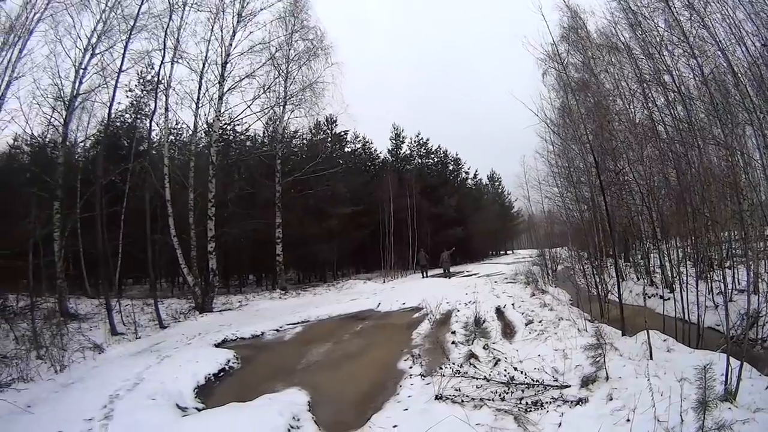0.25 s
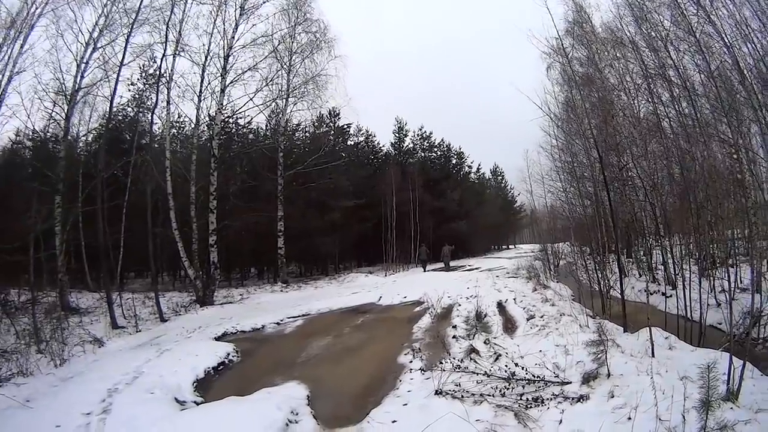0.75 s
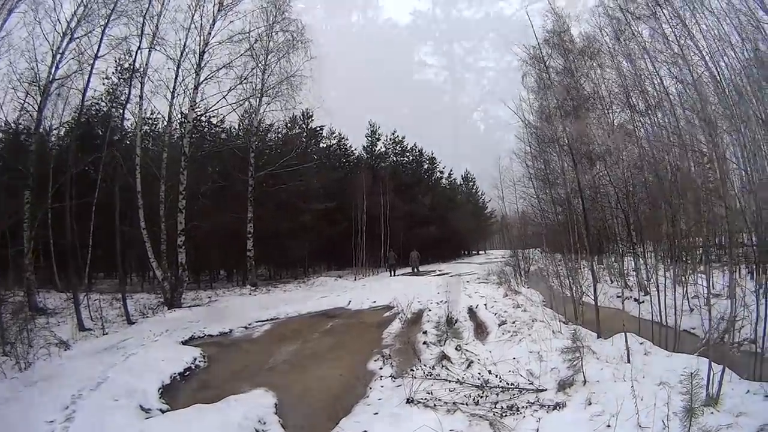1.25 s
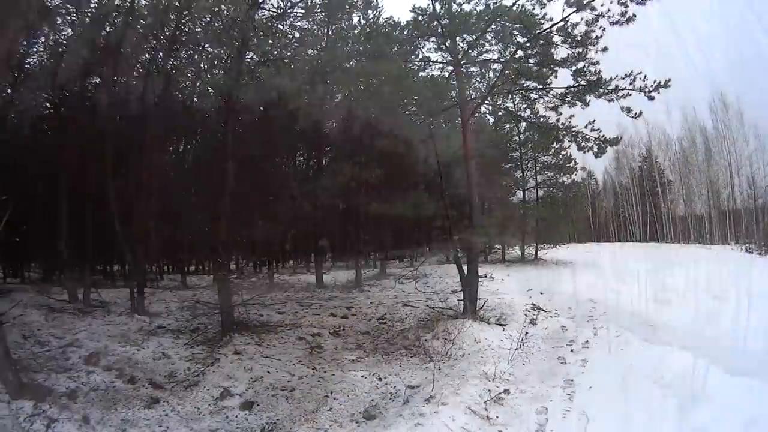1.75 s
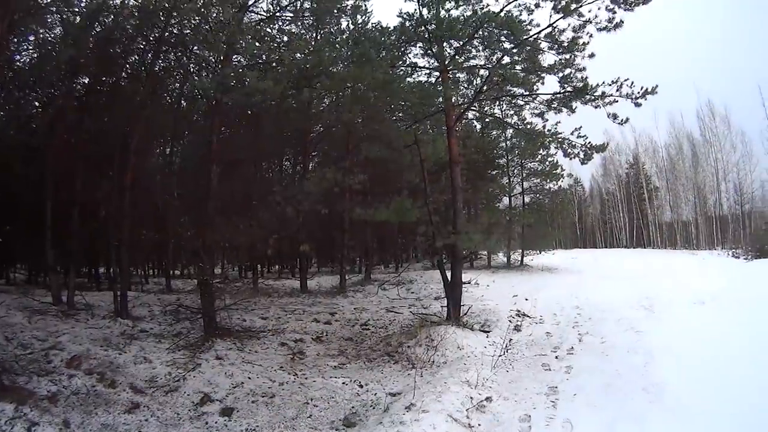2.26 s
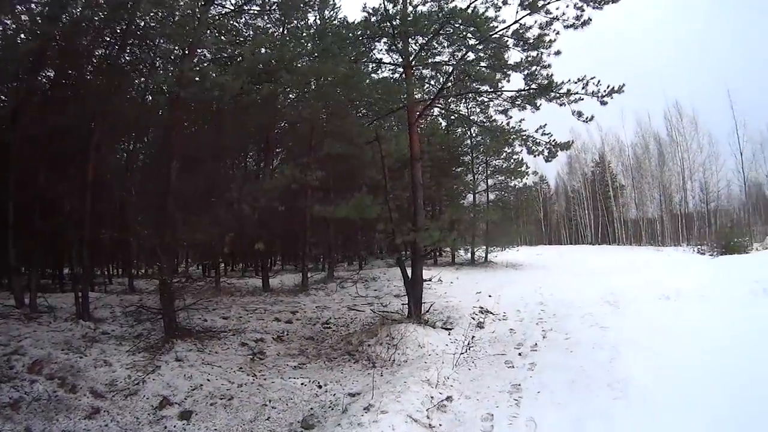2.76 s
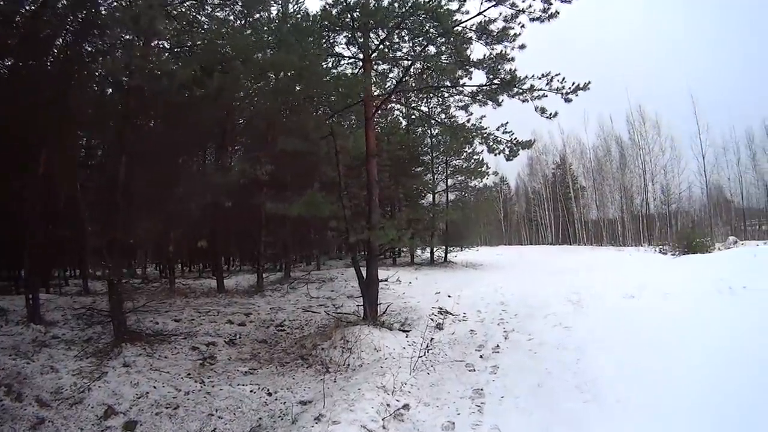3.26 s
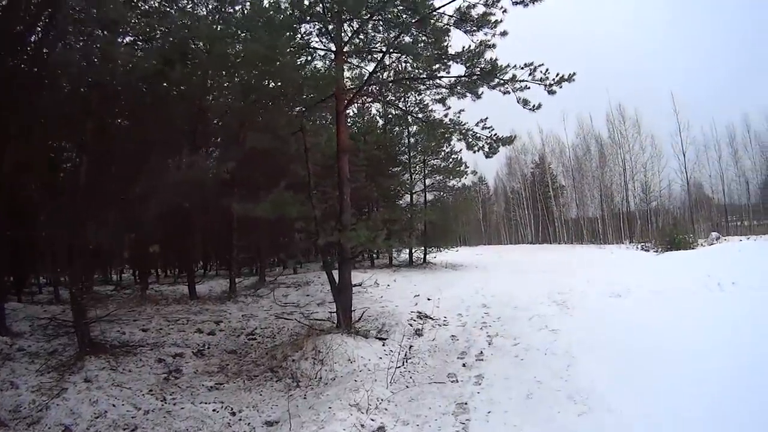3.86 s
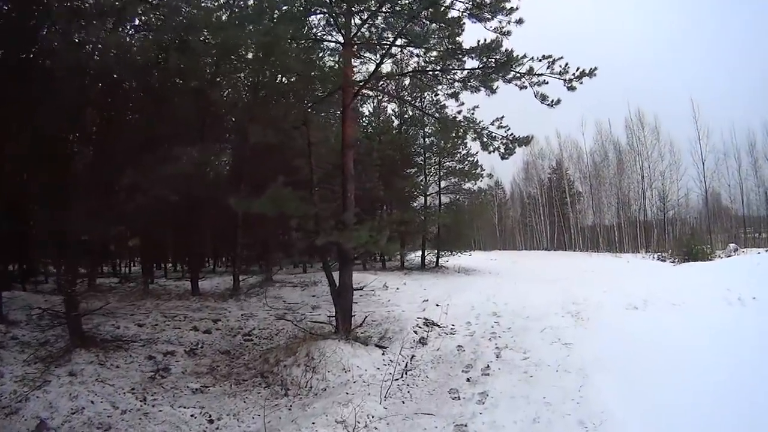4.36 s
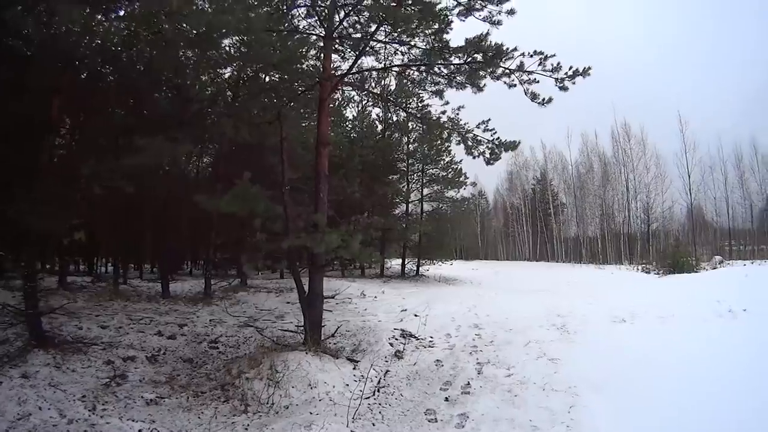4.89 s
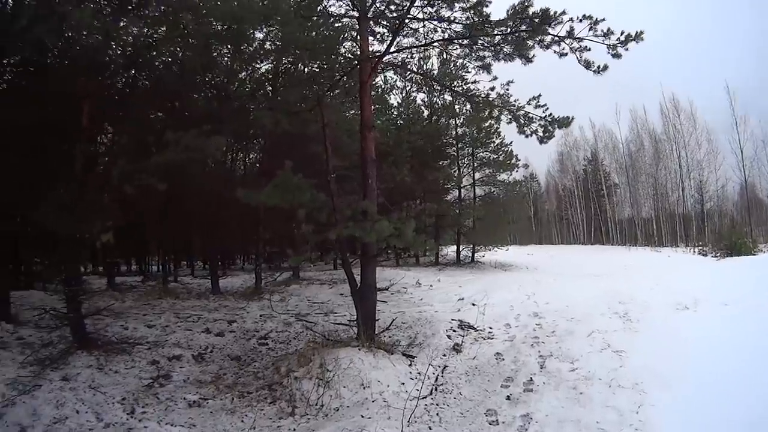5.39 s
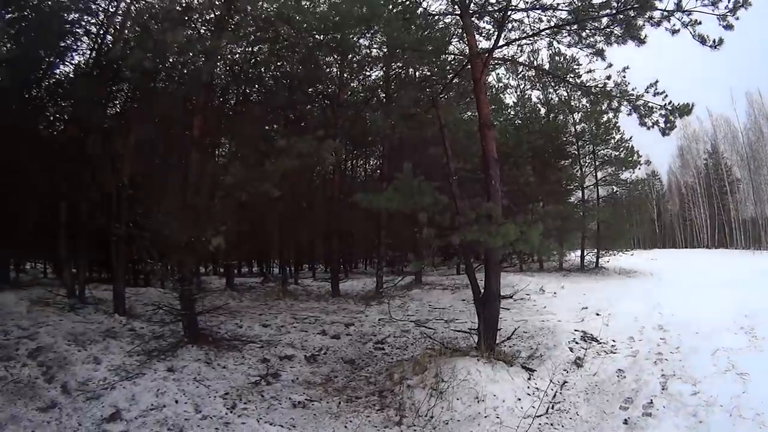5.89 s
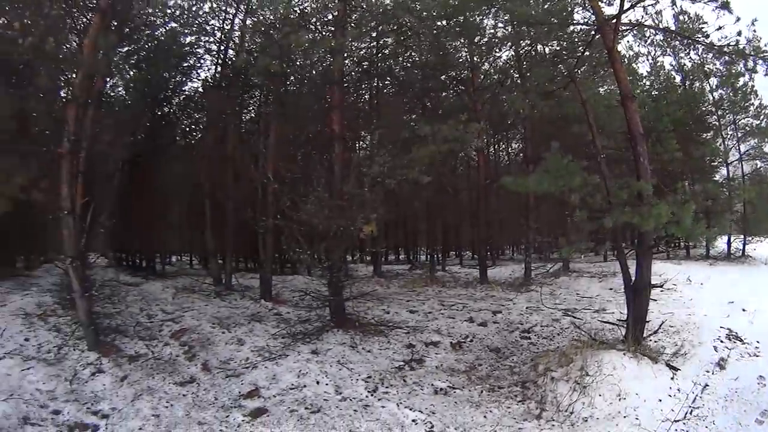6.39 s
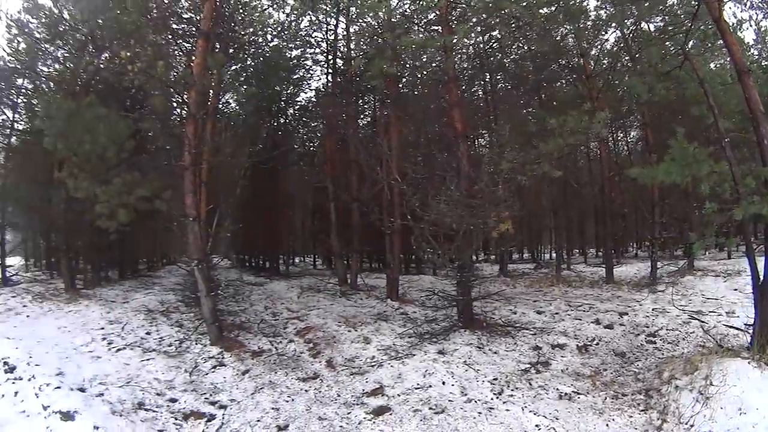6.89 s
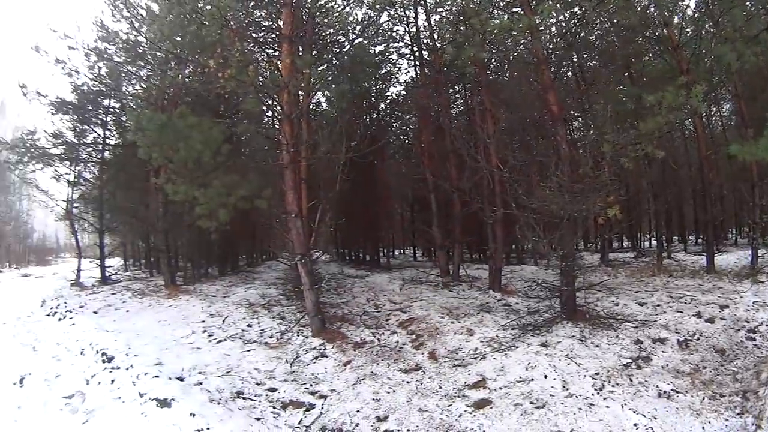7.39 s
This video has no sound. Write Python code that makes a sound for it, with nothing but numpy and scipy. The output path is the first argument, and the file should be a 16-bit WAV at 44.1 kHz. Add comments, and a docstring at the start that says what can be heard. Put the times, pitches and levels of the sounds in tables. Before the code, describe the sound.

Very close to the microphone, a small hard case snaps and ticks in uneven clusters while boots shift and scuff in snow. The clicks grow sparser and duller, jacket cloth swishes more clearly, and a last quick cluster of knocks ends it. Then only faint, steady winter air and hiss remain beside an open pine forest.

```python
"""A camera case clicks sharply and knocks dully, unevenly, as someone shifts about in snow by a pine forest.
Each click is a noisy burst coloured by its ring, its own modes and the case modes; a short dull tail follows.
Snow scuffs and cloth swishes are banded noise under level swells; snow grains ring briefly, cloth ribs zip.
Behind lie still winter air and a faint hiss, as steady banded noise.
The clicks grow sparser, then a last cluster of dull knocks comes and they stop."""
import sys
import numpy as np
from scipy import signal
from scipy.fft import rfft, irfft
from scipy.io import wavfile
from scipy.ndimage import uniform_filter1d

SR = 44100
rng = np.random.default_rng(int(sys.argv[2]) if len(sys.argv) > 2 else 0)


def store_wav(level_fs):
    """Save 16-bit WAV to argv[1]."""
    pcm = np.round(np.clip(np.atleast_2d(level_fs), -1, 1) * 32767)
    wavfile.write(sys.argv[1], SR, pcm.T.astype(np.int16))


N = 336911

# left-right correlation of close snow and cloth: (frequency [Hz], correlation [-1..1])
NEAR_CORRELATION = [(100, 0.9), (400, 0.72), (1000, 0.22), (3000, 0.62), (9000, 0.9)]
SIDES = np.array([[1], [-1]])   # left, right


def from_db(db):
    """Decibels to gain."""
    return 10 ** (np.asarray(db) / 20)


def rms_one(x):
    """Scale to rms 1."""
    return x / np.sqrt(np.mean(x ** 2) + 1e-20)


def at_hz(points, hz):
    """Interpolate (Hz, value) points on a log-frequency axis."""
    known_hz, values = np.transpose(points)
    return np.interp(np.log(hz), np.log(known_hz), values)


def flutter(per_s):
    """Random curve of rms 1, linear between per_s knots a second."""
    position = np.arange(N) / SR * per_s
    knots = rng.standard_normal(int(N / SR * per_s) + 2)
    return rms_one(np.interp(position, np.arange(len(knots)), knots))


def stereo(mid, side, correlation):
    """Mix two unrelated sounds to a left-right pair of given correlation."""
    correlation = np.clip(correlation, -1, 1)
    return np.sqrt((1 + correlation) / 2) * mid + np.sqrt((1 - correlation) / 2) * side * SIDES


def banded_noise(colour, correlation, patchy_db, patches_per_s):
    """Stereo noise in half-octave bands, each flickering on its own; rms 1."""
    edges_hz = np.geomspace(22, 12500, 19)
    white = rng.standard_normal((2, 2, N))   # neighbouring bands use different noise
    out = 0
    for k, (low_hz, high_hz) in enumerate(zip(edges_hz, edges_hz[1:])):
        band = signal.butter(2, [low_hz, high_hz], "band", fs=SR, output="sos")
        mid, side = signal.sosfilt(band, white[k % 2])
        hz = np.sqrt(low_hz * high_hz)
        gain = from_db(at_hz(colour, hz) + patchy_db * flutter(patches_per_s))
        out = out + gain * stereo(mid, side, at_hz(correlation, hz))
    return rms_one(out)


def resonance(f, hz, width_hz, db):
    """Response of a ringing mode that peaks db above its surroundings."""
    return 1 + (from_db(db) - 1) / (1 + 1j * (f * f - hz * hz) / (f * width_hz))


def causal(gain):
    """Minimum-phase response with this gain: no sound before the onset."""
    cepstrum = irfft(np.log(gain))
    half = len(cepstrum) // 2
    cepstrum[1:half] *= 2
    cepstrum[half + 1:] = 0
    return np.exp(rfft(cepstrum))


def swell_db(peak_s, rise_s, fall_s):
    """A move swells to a rounded peak and dies away."""
    drop_db, roundness = 10.5, 1.55   # drop one rise before and one fall after the peak
    t = np.arange(N) / SR - peak_s
    away = np.maximum(-t / rise_s, t / fall_s)
    return -drop_db * np.minimum(away, 10) ** roundness


def effort_db(moves, *rest_db):
    """One level curve per dB column of the moves, which add in power over a restless rustle."""
    # faint rustle under the moves, sinks once the person stands still: (time [s], level [dB])
    restless = [(0, 0), (2, -.5), (3.5, 4.5), (5.6, 0), (5.95, -2), (6.4, -2.5), (6.8, -2), (7.6, -3)]
    known_s, known_db = np.transpose(restless)
    restless_db = np.interp(np.arange(N) / SR, known_s, known_db)
    power = np.outer(from_db(rest_db), from_db(restless_db)) ** 2
    for peak_s, rise_s, fall_s, *level_db in moves:
        swell = from_db(swell_db(peak_s, rise_s, fall_s))
        power = power + np.outer(from_db(level_db), swell) ** 2
    return 10 * np.log10(power)


def still_air():
    """Far murmur of air in the trees under a faint even hiss: steady noise."""
    # spectrum: (frequency [Hz], relative density [dB per Hz])
    air_colour = [(15, -39), (25, -14), (128, -13.5), (156, -14.5), (229, -11.5), (274, -9), (456, -12),
                  (819, -12.5), (1710, -14), (2330, -19), (3160, -18), (10200, -26), (11000, -32),
                  (14300, -53), (22000, -120)]
    # left-right correlation: (frequency [Hz], correlation [-1..1])
    air_correlation = [(60, 0.79), (170, 0.82), (490, -0.82), (1410, -0.93), (4040, -0.32), (11600, 0.55)]
    return from_db(-59) * banded_noise(air_colour, air_correlation, patchy_db=0.25, patches_per_s=6)


def boot_rub(rub_db):
    """Low rubbing as weight shifts: noise under the effort curve."""
    # spectrum: (frequency [Hz], relative density [dB per Hz])
    rub_colour = [(25, -26), (60, -6), (130, -2), (260, -0.5), (450, -5), (800, -19.5), (2000, -27)]
    noise = banded_noise(rub_colour, NEAR_CORRELATION, patchy_db=-0.5, patches_per_s=49)
    return from_db(rub_db + 2.0 * flutter(70)) * noise


def snow_scuff(scuff_db):
    """Grainy scuffing: noise whose level flutters fast."""
    # spectrum: (frequency [Hz], relative density [dB per Hz])
    scuff_colour = [(200, -15), (450, -1.5), (700, 4), (980, 4), (1300, -0.5), (1700, -7.5), (2300, -1.5),
                    (4000, -24)]
    noise = banded_noise(scuff_colour, NEAR_CORRELATION, patchy_db=1.5, patches_per_s=18)
    return from_db(scuff_db + 0.98 * flutter(250)) * noise


def crunch_and_folds(scuff_db, weave_db):
    """Bright crunch of hard-pressed snow and rasp of cloth folds: one noise, powers added."""
    # spectrum: (frequency [Hz], relative density [dB per Hz])
    rasp_colour = [(700, -20), (1400, -2), (2200, -3), (2900, -1.5), (3900, -8.5), (5500, -5), (8000, -20)]
    folds_db, folds_limit_db = 1.5, -54   # folds over weave; weave level where they level off
    peak_crunch_db, growth, grain_db = -57, 2.6, 5   # growth: dB of crunch per dB of scuff
    folds_level_db = weave_db + folds_db - 10 * np.log10(1 + from_db(weave_db - folds_limit_db) ** 2)
    crunch_db = peak_crunch_db + growth * (scuff_db - np.max(scuff_db)) + grain_db * flutter(370)
    noise = banded_noise(rasp_colour, NEAR_CORRELATION, patchy_db=3.5, patches_per_s=24)
    return np.hypot(from_db(folds_level_db), from_db(crunch_db)) * noise


def cloth_weave(weave_db):
    """Smooth bright swish of sliding cloth: high noise."""
    # spectrum: (frequency [Hz], relative density [dB per Hz])
    weave_colour = [(1500, -36), (3200, -0.5), (4500, -2), (5500, 0.5), (7500, 2.5), (9500, 3.5),
                    (11500, 2)]
    noise = banded_noise(weave_colour, NEAR_CORRELATION, patchy_db=0.5, patches_per_s=18)
    return from_db(weave_db) * noise


def movement(rub_db, scuff_db):
    """Boots on snow follow their effort curves, cloth follows its own swishes."""
    # jacket cloth slides: (peak [s], rise [s], fall [s], level [dB])
    swishes = [(0.43, 0.04, 0.075, -59), (0.98, 0.21, 0.13, -65.5), (1.28, 0.11, 0.071, -60),
               (1.6, 0.061, 0.078, -54), (1.67, 0.057, 0.061, -58), (2.96, 0.053, 0.054, -53),
               (3.03, .05, 0.059, -56.5), (3.25, 0.039, 0.055, -58), (3.56, 0.072, 0.08, -45.5),
               (3.82, 0.028, 0.13, -60.5), (3.98, 0.037, .03, -63), (4.12, .1, 0.12, -61.5),
               (4.37, 0.082, 0.043, -50), (4.47, 0.055, 0.025, -60), (4.8, 0.068, 0.27, -61),
               (5.06, 0.056, 0.077, -45), (5.17, 0.051, 0.13, -62), (5.54, 0.096, 0.078, -65.5)]
    weave_db, = effort_db(swishes, -69.5)
    snow = boot_rub(rub_db) + snow_scuff(scuff_db)
    return snow + crunch_and_folds(scuff_db, weave_db) + cloth_weave(weave_db)


def settling_snow(rub_db, per_s, level_db, size_spread_db, cycles, count=12):
    """Small dull grains give way under the boot, more and louder as it presses harder; each rings briefly."""
    pressure = from_db(rub_db - np.max(rub_db))   # per_s holds at pressure 1
    chance, size, sign = rng.random(N), rng.standard_normal(N), rng.choice([-1, 1], N)
    grain_gain = from_db(rub_db + level_db + size_spread_db * np.clip(size, -2, 2))
    grains = (chance < per_s * pressure / SR) * sign * grain_gain
    resonator = rng.integers(0, count, N)
    out = 0
    for k, hz in enumerate(np.geomspace(220, 1200, count)):
        r = from_db(-60 * hz / (cycles * SR))   # 60 dB down after this many cycles
        w = 2 * np.pi * hz / SR
        struck = grains * (resonator == k) + 1e-18
        out = out + signal.lfilter([0, np.sin(w)], [1, -2 * r * np.cos(w), r * r], struck)
    return out


def click_settings(f):
    """Snaps, ticks and knocks as (s, colour dB, ring Hz, undamped width Hz, ring dB, rattle ms, pan dB)."""
    # Ring widths are before the extra damping of high rings; pan is left over right.
    # bright snaps of the handled case: (time [s], level [dB], bass [dB], treble [dB], ring [Hz],
    # ring width [Hz], ring height [dB], rattle time [ms], pan [dB])
    snaps = [(0.2844, -8, 0, 11.5, 965, 174, 16, 1.2, 0.5), (0.3052, -19, -4, 10, 960, 180, 18, 1.5, -9),
             (0.35, -6, -12, 3, 1000, 74, 8, 1.6, -1), (0.5656, -4, 0, 4, 2530, 220, 13.5, 1.1, -5.5),
             (0.5999, 0.5, -4, -0.5, 2590, 160, 12.5, 1.7, -6), (0.7, -6, -20, -7, 2820, 120, 13, 0.91, 0),
             (0.994, -1, 20.5, 10.5, 310, 140, 12, 1.7, 0.5),
             (1.258, -11.5, -6, 19, 8000, 900, 6.5, 1.3, -1.5), (1.3202, 13, 1, -3, 940, 145, 3, 0.63, 1),
             (1.3251, 0.5, -20, 2.5, 910, 152, 4, 1.1, 5),
             (1.4211, 12.5, -14, 4.5, 2170, 70, 6.5, 1.4, -1.5),
             (1.525, 1.5, 16, -15, 910, 466, 14, 0.73, -2.5),
             (1.6105, 9.5, 5.5, 6.5, 1350, 200, 8.5, 1.23, 1.5),
             (1.661, 2.5, 18.5, -3.5, 576, 250, 9, 0.88, -4.5),
             (1.782, 12, -13, -12, 1540, 300, -1, 1.2, -3.5), (1.903, 12, 1, 3, 851, 35, 19.5, 1.45, -0.5),
             (2.1091, 13, -1.5, 3, 1100, 160, 8.5, 1.4, 1),
             (2.9188, 15, -2.5, -3.5, 1010, 130, 5.5, 1.57, 3.5)]
    # small hollow ticks of the case: (time [s], level [dB], bass [dB], ring [Hz], rattle time [ms], pan [dB])
    ticks = [(0.0648, 4, 11, 813, 2.3, 1), (0.2996, -6, 11, 850, 2.7, 0), (0.3204, -9.5, 11, 900, 3.3, 2),
             (0.345, -8, 14, 830, 1.8, 1), (0.389, -13.5, -4, 855, 6, 4), (0.45, -7, 8, 880, 1.7, 2),
             (0.4718, -7.5, 0, 905, 1.1, -1), (0.5406, -5, -16, 877, 0.72, -1),
             (0.649, -10.5, -6, 863, 2, -7), (0.6649, -3, 14, 930, 3, -1.5),
             (0.7039, 1, -13, 904, 1.4, -3.5), (0.731, 1, -22, 925, 2.2, -3), (1.1982, 2, -28, 860, 2, 5.5),
             (1.2889, -8.5, -14, 925, 2.2, 11), (1.4008, -9, -8, 940, 1.1, -9),
             (1.4527, -2, -21, 727, 1.5, -5), (1.649, -1.5, -4, 885, 4.1, 15),
             (1.8337, -9, -13, 720, 1.3, -2)]
    # dull knocks on the camera case: (time [s], level [dB], tilt [dB per octave], ring [Hz],
    # ring height [dB], rattle time [ms])
    knocks = [(0.2423, 12, 1.3, 297, 6.5, 1.9), (1.2453, -5, -3.5, 713, 7, 5),
              (1.2769, -4.5, -2, 875, 12, 2.4), (1.3924, 6.5, -1, 820, 4.5, 1.1), (1.41, 5, 0, 800, 7, 13),
              (1.441, -4.5, 0, 250, 13, 2), (2.5364, -18, 1, 500, 23.5, 0.44),
              (3.2393, 5.5, 1.5, 675, 9.5, 3.5), (3.2783, 7, -1.5, 1000, 7, 8.7),
              (3.3332, 0.5, 2.5, 850, 8.5, 3.9), (3.6865, 7, 0.95, 940, 13.5, 2.3),
              (4.0585, 10, -0.2, 920, 12.5, 1.8), (4.16, -15, 5, 355, 19.5, 1.7),
              (4.51, 10.5, 0.65, 325, 9, 2.35), (4.7016, 0, 0.5, 840, 16, 1.4),
              (5.2452, 1, 0.8, 980, 7.5, 1.2), (5.282, -1.5, 1, 1030, 5, 13),
              (5.6032, 2, -1.9, 810, 11.5, 1.6), (5.6321, -5, -0.5, 372, 8, 3.4),
              (5.708, 10, -1, 1170, 7.5, 1.4), (5.7393, 6.5, -2.2, 520, 4.5, 1.7),
              (5.7566, -6.5, -1, 860, 10.5, 1.3), (5.7934, -1, -1, 181, 4, 1.5),
              (5.8202, -3.5, -0.5, 180, 10, 1.3), (5.8334, 12, -0.8, 576, 3.5, 2.7)]
    # base spectrum of each kind: (frequency [Hz], gain [dB])
    snap_colour = [(110, -7), (250, -9.5), (600, -0.5), (1400, 0), (2100, -3.5), (3100, -9), (5000, -10.5),
                   (6200, -19), (7600, -14), (10000, -17.5)]
    tick_colour = [(110, -3), (250, -15.5), (600, -10.5), (1400, -0.5), (3500, -15), (9000, -44)]
    knock_colour = [(110, 5.5), (250, 1.5), (600, -4), (1400, -14), (3500, -27.5), (9000, -31)]
    tick_width_hz, tick_ring_db = 110, 15
    knock_q, knock_pan_db, knock_pivot_hz = 2.96, 1.3, 500

    def tone_db(bass_db, treble_db):
        return at_hz([(250, bass_db), (1440, 0), (9100, treble_db)], f)

    for s, db, bass_db, treble_db, *ring_rattle_pan in snaps:
        colour_db = at_hz(snap_colour, f) + db + tone_db(bass_db, treble_db)
        yield s, colour_db, *ring_rattle_pan
    for s, db, bass_db, ring_hz, rattle_ms, pan_db in ticks:
        colour_db = at_hz(tick_colour, f) + db + tone_db(bass_db, 0)
        yield s, colour_db, ring_hz, tick_width_hz, tick_ring_db, rattle_ms, pan_db
    for s, db, tilt_db, ring_hz, ring_db, rattle_ms in knocks:
        octaves = np.log2(np.maximum(f, 110) / knock_pivot_hz)
        colour_db = at_hz(knock_colour, f) + db + tilt_db * octaves
        yield s, colour_db, ring_hz, ring_hz / knock_q, ring_db, rattle_ms, knock_pan_db


def click_burst(f, rattle_ms, clean_ms, rattle_hz, correlation, grain_db):
    """One sudden push and a noisy rattle that swells and trails off; flat over broad bands."""
    size = 2 * (len(f) - 1)
    age = 1000 * np.arange(size) / SR / rattle_ms
    envelope = np.sqrt(age) / (1 + (0.95 * age) ** 2) ** (3 / 2)
    mid, side, grain = rng.standard_normal((3, size))
    rattle = stereo(mid, side, correlation) * from_db(grain_db * grain) * envelope
    rattle = rfft(rattle / np.sqrt(np.sum(rattle ** 2, axis=1, keepdims=True)))
    clean = np.exp(-rattle_ms / clean_ms)   # power left in the sudden push; less in long rattles
    treble = 1 / (1 + rattle_hz / (1j * f))   # bass is a single push, only treble rattles
    push = (1 - treble) + treble * (np.sqrt(clean) + np.sqrt(1 - clean) * rattle)
    power = np.mean(np.abs(push) ** 2, axis=0)
    return push / causal(np.sqrt(uniform_filter1d(power, size=70)))


def click_modes(f, low_hz, high_hz, q, lift_db, count=5):
    """Each click has a few random modes of its own; broad-band level is evened out."""
    steps = (np.arange(count) + rng.random(count)) / count
    modes_hz = low_hz * (high_hz / low_hz) ** steps
    response = np.prod([resonance(f, hz, hz / q, lift_db) for hz in modes_hz], axis=0)
    return response / causal(np.sqrt(uniform_filter1d(np.abs(response) ** 2, size=260)))


def case_clicks(size=8192):
    """Every click has its own colour and ring and excites the fixed modes of the camera case."""
    # case modes, the narrow ones ring on: (frequency [Hz], width [Hz], height [dB])
    case_modes = [(850, 25, 3), (1090, 36, 3), (1388, 36, 3), (2175, 400, 4.5), (3770, 640, 7),
                  (3760, 45, 2.5), (4850, 330, 3.5), (5250, 55, 3), (7260, 460, 7.5)]
    f = np.arange(size // 2 + 1) * SR / size + 1
    case = np.prod([resonance(f, *mode) for mode in case_modes], axis=0)
    bass_cut_hz, level_db, lag_spread_samples, ring_split_widths = 133, -1.0, 1.0, -0.66
    case = case * from_db(level_db) / (1 + bass_cut_hz / (1j * f)) ** 2
    out = np.zeros((2, N + size))
    for s, colour_db, ring_hz, undamped_hz, ring_db, rattle_ms, pan_db in click_settings(f):
        width_hz = undamped_hz + (ring_hz / 260) ** 2   # high rings are damped more
        pair_hz = ring_hz + ring_split_widths * width_hz * SIDES   # a close pair, one to each side
        ring = resonance(f, pair_hz, width_hz, ring_db)
        burst = click_burst(f, rattle_ms, clean_ms=0.92, rattle_hz=436, correlation=0.36, grain_db=7.5)
        colour = causal(from_db(colour_db)) * click_modes(f, low_hz=1499, high_hz=7430, q=24, lift_db=6.0)
        sound = irfft(burst * colour * ring * case) * from_db(SIDES * pan_db / 2)
        lags = np.abs(rng.standard_normal(2)) * lag_spread_samples
        for channel, lag in enumerate(lags):
            start = int(s * SR + lag)
            out[channel, start:start + size // 2] += sound[channel, :size // 2]
    return out[:, :N]


def ring_tail(x, t60_s, low_hz, high_hz):
    """A short, dull ringing tail follows each click: convolution with decaying band noise."""
    t = np.arange(SR // 2) / SR
    tail = rng.standard_normal((2, len(t))) * from_db(-60 * t / t60_s)
    tail = tail / np.sqrt(np.sum(tail ** 2, axis=1, keepdims=True))
    band = signal.butter(2, [low_hz, high_hz], "band", fs=SR, output="sos")
    return signal.fftconvolve(x, signal.sosfilt(band, tail), axes=1)[:, :N]


def cloth_zip(flutter_per_s):
    """Cloth ribs zip over each other: narrow noise around a gliding pitch."""
    # (peak [s], rise [s], fall [s], pitch at peak [Hz], glide [Hz per s], level [dB])
    zips = [(4.46, 0.055, 0.027, 3040, -3000, -60.5), (5.13, .1, 0.043, 2885, 5999.5, -55.5)]
    out = 0
    for peak_s, rise_s, fall_s, hz, glide, level_db in zips:
        pitch_hz = hz + glide * np.clip(np.arange(N) / SR - peak_s, -2 * rise_s, 2 * fall_s)
        phase = 2 * np.pi * np.cumsum(pitch_hz) / SR
        mid, side = [flutter(flutter_per_s) * np.cos(phase) + flutter(flutter_per_s) * np.sin(phase)
                     for _ in range(2)]
        gain = from_db(level_db + swell_db(peak_s, rise_s, fall_s))
        out = out + gain * stereo(mid, side, correlation=0.84)
    return out


def scene():
    """Close case clicks with their short tail, over movement and air."""
    # a boot shifts its weight: (peak [s], rise [s], fall [s], low rub [dB], snow scuff [dB])
    shifts = [(0.04, 0.087, 0.2, -61.5, -76), (0.42, 0.035, .08, -64.5, -60), (0.67, 0.14, 0.25, -62, -77),
              (1.05, 0.063, 0.19, -58.5, -67), (1.28, 0.28, 0.13, -59, -53), (1.48, 0.095, 0.029, -52, -72),
              (1.67, 0.11, 0.074, -63, -49), (1.85, 0.19, 0.16, -63.5, -57), (2.22, 0.17, 0.67, -66, -61),
              (2.68, 0.33, .25, -64, -60.5), (2.98, 0.071, 0.12, -67, -48), (3.28, 0.1, 0.1, -55.5, -49.5),
              (3.58, 0.17, 0.088, -61, -54.5), (4.1, 0.21, 0.12, -57, -54.5), (4.38, 0.18, 0.056, -74, -62),
              (4.62, 0.17, 0.2, -69, -77), (4.86, 0.14, 0.093, -56.5, -54.5),
              (5.08, 0.092, 0.12, -61.5, -55.5), (5.28, .1, .08, -58, -64),
              (5.56, 0.13, 0.13, -65.5, -57.5), (5.74, .12, 0.13, -63, -80), (6.3, 0.19, 0.24, -66.5, -75)]
    rub_db, scuff_db = effort_db(shifts, -68.5, -65.5)
    grains = settling_snow(rub_db, per_s=55, level_db=10.5, size_spread_db=3.5, cycles=10)
    near = case_clicks()
    tail = from_db(-12.5) * ring_tail(near, t60_s=0.11, low_hz=650, high_hz=2000)
    moves = movement(rub_db, scuff_db) + cloth_zip(flutter_per_s=400)
    return still_air() + moves + grains + near + tail


def record(dry):
    """Steep elliptic low-pass at 11.1 kHz."""
    return signal.sosfilt(signal.ellip(12, 0.2, 75, 11100, fs=SR, output="sos"), dry)


dry = scene()
out = record(dry)
store_wav(out)
```